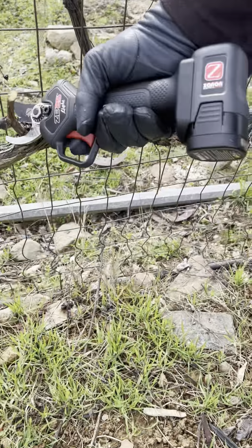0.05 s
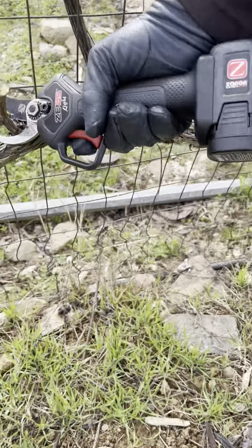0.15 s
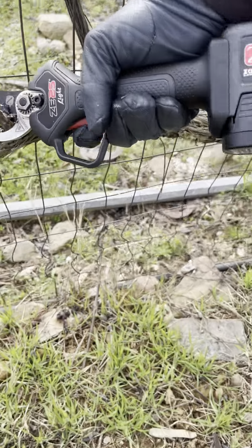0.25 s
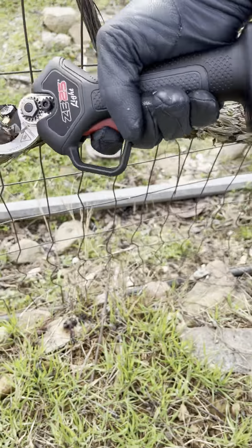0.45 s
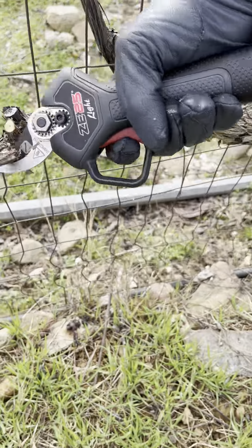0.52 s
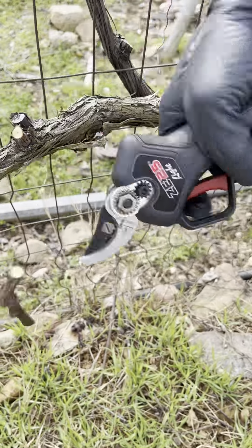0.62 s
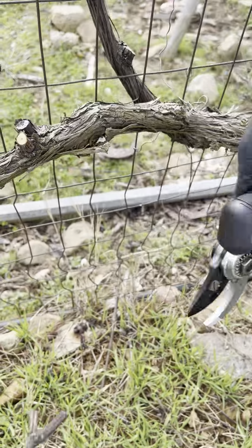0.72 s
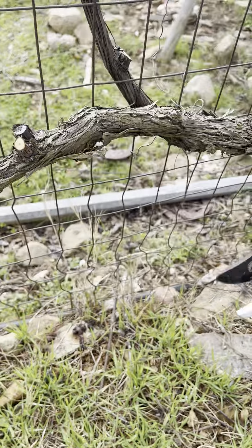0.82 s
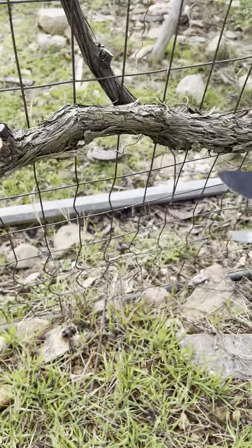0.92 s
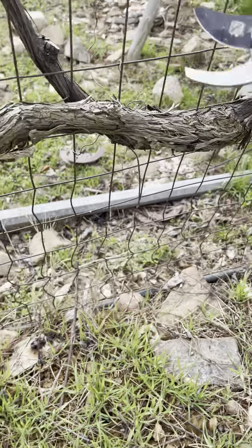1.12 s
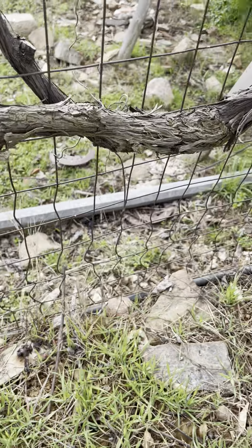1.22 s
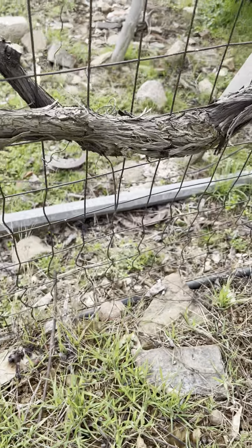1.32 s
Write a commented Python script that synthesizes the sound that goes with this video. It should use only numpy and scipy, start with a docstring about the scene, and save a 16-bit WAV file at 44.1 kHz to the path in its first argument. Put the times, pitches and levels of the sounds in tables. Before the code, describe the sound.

Two quick motor whines from electric pruning shears as the blade shuts and reopens.

```python
"""Outdoors, a battery pruning shear held close to a pair of microphones, over a faint rumble.
First a glove rustles and bumps on the grip. At 0.24 s the motor coils buzz, the rotor spins up, and
the gears whine and rattle in the casing; the blade knocks shut and the rotor brakes.
At 0.6 s a second stroke starts the same way, opens the blade and brakes in turn.
A faint low hum sinks and fades, leaving the glove and the rumble."""
import sys
import numpy as np
from scipy import signal
from scipy.fft import rfft, irfft
from scipy.io import wavfile

SR = 44100
rng = np.random.default_rng(int(sys.argv[2]) if len(sys.argv) > 2 else 0)


def put_to_file(sound):
    """Save the sound as 16-bit audio at rate SR, in the file named by the first command-line argument."""
    columns = np.atleast_2d(sound).T  # one column per channel
    safe = np.clip(columns, -1, 1)
    whole_steps = np.round(safe * 32767)
    wavfile.write(sys.argv[1], SR, whole_steps.astype(np.int16))


N = 59535
T = np.arange(N) / SR
HZ = np.fft.rfftfreq(2 * N, 1 / SR)


def from_db(db):
    """Decibels to gain."""
    return 10 ** (np.asarray(db) / 20)


def unit_rms(x):
    """Scale to unit power."""
    return x / np.sqrt(np.mean(x ** 2) + 1e-20)


def in_time(rows):
    """Each column of a curve at every sample."""
    times, *columns = np.transpose(rows)
    return [np.interp(T, times, column) for column in columns]


def during(start, end):
    """One from start to end, with 10 ms fades outside."""
    return np.clip(1 + 100 * np.minimum(T - start, end - T), 0, 1) ** 2


def at_hz(points, hz=HZ):
    """Read a spectrum on a log-frequency axis."""
    freqs, values = np.transpose(points)
    return np.interp(np.log(np.maximum(hz, 1)), np.log(freqs), values)


def filtered(x, gain):
    """Apply a frequency response."""
    return irfft(rfft(x, 2 * N) * gain)[:N]


def noise(gain):
    """Unit-power noise with the given spectrum."""
    return unit_rms(filtered(rng.standard_normal(N), gain))


def drift(hz):
    """Random wander up to the given rate, spread 1."""
    return noise(1 / (1 + (HZ / hz) ** 4))


def contacts(rows):
    """Each contact is a quickly dying noise burst around its own pitch."""
    out = np.zeros(N)
    for start, db, hz, octaves, t60 in rows:
        burst = noise(np.exp(-.5 * (np.log2((HZ + 1) / hz) / octaves) ** 2))
        age = np.maximum(T - start, 0)
        envelope = (1 - np.exp(-age * hz)) * np.exp(-np.log(1000) * age / t60)
        out += from_db(db) * envelope * burst
    return out


# Colour of the open air: (frequency [Hz], relative level [dB])
RUMBLE_COLOUR = [(20, -21), (35, -14), (55, 2.5), (95, 2), (160, -3), (270, -1), (400, -14.5), (700, -29.5),
                 (1100, -34.5), (3500, -31.5), (6500, -48.5), (11500, -54.5), (14000, -57.5)]
# Low hum in the background: (time [s], pitch [Hz], level [dB])
SINKING_HUM = [(.84, 296.7, -59.5), (.94, 257.2, -51.5), (1.06, 227.7, -51), (1.12, 197.7, -69)]


def outdoors(rumble_db=-56.5, side_db=-17, waver_db=3.5, waver_hz=17):
    """The bed of the place: faint rumble, nearly alike at both microphones, and a sinking hum."""
    mid, side = [noise(from_db(at_hz(RUMBLE_COLOUR))) for _ in range(2)]
    rumble = from_db(rumble_db) * (mid + from_db(side_db) * side * np.array([[1], [-1]]))
    hz, db = in_time(SINKING_HUM)
    hum_level = during(SINKING_HUM[0][0], SINKING_HUM[-1][0]) * from_db(db + waver_db * drift(hz=66.7))
    hum_cycles = np.cumsum(hz + waver_hz * drift(hz=40.9)) / SR
    return rumble + hum_level * np.sin(2 * np.pi * hum_cycles)


# Glove rubbing on the grip: (time [s], level [dB])
GLOVE_RUSTLE = [(0, -51), (.08, -70.5), (.15, -53), (.2, -58), (.56, -60.5), (.91, -56), (.97, -67),
                (1.02, -72.5), (1.35, -69.5)]
# Colour of that rustle: (frequency [Hz], relative level [dB])
GLOVE_COLOUR = [(400, 11.5), (1800, -5), (3200, -6.5), (4800, -4), (6500, -3.5), (8500, -2.5), (11000, 4),
                (13000, -26.5), (15000, -37.5)]
# Bumps on the grip: (time [s], level [dB], centre [Hz], width [octaves], t60 [s])
GLOVE_BUMPS = [(.064, -56.5, 746, 0.78, 0.1), (.092, -53, 1510, 0.42, 0.081), (.107, -38, 464, 0.4, 0.023),
               (.128, -33, 87, .9, 0.082)]


def glove():
    """Close to the microphones, a glove rustles and bumps on the grip."""
    db, = in_time(GLOVE_RUSTLE)
    return from_db(db) * noise(from_db(at_hz(GLOVE_COLOUR))) + contacts(GLOVE_BUMPS)


# The brake holding the rotor: (start [s], end [s], pitch [Hz], level [dB])
BRAKE_HOLDS = [(0.511, 0.544, 441.4, -44), (0.826, 0.889, 457, -49)]
# Harmonics of its buzz: (multiple of the pitch, relative level [dB])
BUZZ_HARMONICS = [(4, -1.5), (5, -2), (6, -2), (8, -14.5), (9, -17), (10, -8)]


def brake_buzz(waver_hz=3, flutter_db=3.5, wander_rate_hz=80):
    """The braking coils buzz on one pitch; the housing brings out the middle harmonics."""
    out = np.zeros(N)
    for start, end, hz, db in BRAKE_HOLDS:
        cycles = np.cumsum(hz + waver_hz * drift(wander_rate_hz)) / SR
        buzz = np.zeros(N)
        for multiple, harmonic_db in BUZZ_HARMONICS:
            level = from_db(harmonic_db + flutter_db * drift(wander_rate_hz))
            buzz += level * np.sin(2 * np.pi * (multiple * cycles + rng.random()))
        out += from_db(db) * during(start, end) * unit_rms(buzz)
    return out


# Modes of the housing: (frequency [Hz], gain [dB], t60 [s])
HOUSING_MODES = [(361, -21, 0.21), (795, -15.5, 0.049), (1984, -3.5, 0.061), (2423, -0.5, 0.046),
                 (3380, -3, 0.015), (4750, -2.5, 0.024), (5900, -12.5, 0.0415), (6050, -5, 0.01),
                 (7700, -8, .02)]


def housing_ring(jolts):
    """Each jolt sets the housing's modes ringing as dying sines."""
    out = np.zeros(N)
    for hz, db, t60 in HOUSING_MODES:
        decay, angle = np.exp(-np.log(1000) / (t60 * SR)), 2 * np.pi * hz / SR
        feedback = [1, -2 * decay * np.cos(angle), decay ** 2]
        out += from_db(db) * signal.lfilter([0, np.sin(angle)], feedback, jolts + 1e-18)
    return out


# Pulses before the rotor turns: (time [s], level [dB], pitch [Hz], jolt to the housing [dB])
START_PULSES = [(0.243, -15.5, 6520, -42.5), (0.2457, -11, 6530, -32.5), (0.5962, -16.5, 6600, -33),
                (0.5988, -18.5, 6230, -38)]


def coil_pulses(pulse_s=.0031):
    """Two shrill pulses of current start each stroke and jolt the housing."""
    pulses, jolts = np.zeros(N), np.zeros(N)
    for start, db, hz, jolt_db in START_PULSES:
        age = T - start
        envelope = np.sin(np.pi * np.clip(age / pulse_s, 0, 1)) ** 2
        pulses += from_db(db) * envelope * np.sin(2 * np.pi * hz * age)
        jolts[int(start * SR)] = from_db(jolt_db)
    return pulses + housing_ring(jolts)


# Knocks in the tool: (time [s], level [dB], centre [Hz], width [octaves], t60 [s])
TOOL_KNOCKS = [(.3993, -9.5, 6300, .2, .006), (.412, -32, 6400, 0.055, 0.0087),
               (.4205, -19, 7400, 0.12, 0.008), (.4208, -20, 2196, .9, 0.018),
               (.422, -33.5, 450, 1.7, 0.031), (.8045, -26.5, 1710, 0.096, .022),
               (.8348, -20, 6780, 1.3, 0.0054), (.954, -52, 5560, 1.3, 0.069)]


def knocks():
    """Blade, gears and trigger knock at close range around the end of each stroke."""
    return contacts(TOOL_KNOCKS)


# Resonances of the casing: (frequency [Hz], gain [dB])
CASING_COLOUR = [(120, -28.5), (300, -13.5), (550, -23), (780, -10.5), (1050, -20), (1400, -14), (1750, -7),
                 (2050, -9), (2450, -6), (3000, -17.5), (3500, -11), (4500, -10.5), (5400, -9), (6300, 1.5),
                 (7200, -5), (8000, 1), (9000, -30), (9800, -3.5), (10600, 0), (12000, -6.5), (13200, -17),
                 (14500, -35)]
TREBLE_SPLIT_HZ = 4500


def casing_gain(hz):
    """The casing colours the gears' sound on its way out to the microphones."""
    return from_db(at_hz(CASING_COLOUR, hz))


def gear_rattle(speed, low_db, bright_db, teeth_per_turn=7.5, decay_per_tooth=.6, scatter_db=1.5):
    """Teeth clatter in rapid, uneven bursts that follow the rotor, heard through the casing."""
    teeth = np.cumsum(speed) / SR * teeth_per_turn
    strength = from_db(scatter_db * rng.standard_normal(N))[teeth.astype(int)]
    bursts = unit_rms(strength * np.exp(-decay_per_tooth * (teeth % 1))) * rng.standard_normal(N)
    lowpass = 1 / (1 + (HZ / TREBLE_SPLIT_HZ) ** 8)
    low = filtered(bursts, unit_rms(casing_gain(HZ) * lowpass))
    bright = filtered(bursts, unit_rms(casing_gain(HZ) * (1 - lowpass)))
    return from_db(low_db) * low + from_db(bright_db) * bright


# Pitch of each gear tone: (multiple of the rotor speed)
GEAR_ORDERS = [1, 3.25, 4, 5, 7.5, 10.5, 12, 20, 21.66, 22.66, 27, 32.1, 35, 37.5, 42.6]
# Their relative levels: (closing free [dB], closing strained [dB], opening free [dB],
# opening strained [dB])
GEAR_LEVELS = [(-58, -50, -37, -38), (-50, -48, -43, -48), (-44, -41, -39.5, -49), (-58, -41, -29.5, -35),
               (-35.5, -37, -42.5, -36), (-21, -26.5, -45, -23.5), (-40, -41, -44, -29),
               (-33, -32, -44, -46), (-27, -33, -19, -33), (-32, -39, -35, -38), (-45, -34, -50, -42),
               (-40, -25, -44, -31), (-39, -30, -54, -37), (-55, -34, -54, -43), (-40, -27, -53, -28)]
# Shrill tones as the tool is drawn away from the microphones: (time [s], gain [dB])
DRAW_AWAY = [(.72, 0), (.75, -5.5)]


def gear_whine(speed, strain, opening):
    """Gear tones sweep through the casing's resonances; strain shifts their balance and adds judder."""
    judder_turns = (.001 + .0018 * strain) * drift(hz=169)
    turns = np.cumsum(speed) / SR + judder_turns
    fade_db, = in_time(DRAW_AWAY)
    out = np.zeros(N)
    for multiple, levels in zip(GEAR_ORDERS, GEAR_LEVELS):
        free_db, strained_db = levels[2:] if opening else levels[:2]
        level = (1 - strain) * from_db(free_db) + strain * from_db(strained_db)
        flutter_db = (1.7 + 3 * strain) * drift(hz=130)
        is_shrill = multiple * np.max(speed) > TREBLE_SPLIT_HZ
        tone = np.sin(2 * np.pi * (multiple * turns + rng.random()))
        out += level * casing_gain(multiple * speed) * from_db(flutter_db + is_shrill * fade_db) * tone
    return out


# The rotor in each stroke: (time [s], speed [turns/s])
CLOSING_SPEED = [(.255, 30), (.274, 150), (.286, 240), (.298, 284), (.318, 316), (.345, 325), (.36, 322),
                 (.378, 308), (.42, 300), (.44, 254), (.453, 182), (.469, 125), (.5, 65), (.55, 20)]
OPENING_SPEED = [(.608, 30), (.624, 155), (.648, 276), (.662, 304), (.682, 322), (.715, 334), (.762, 334.5),
                 (.772, 322), (.785, 272), (.803, 178), (.83, 80), (.89, 30)]
# Effort in each stroke: (time [s], whine gain [dB], strain [0-1], low rattle [dB], bright rattle [dB])
CLOSING_EFFORT = [(.252, -49, 0.3, -37, -61.5), (.266, -13, 1, -52.5, -36), (0.281, .5, 0.49, -44, -41),
                  (.3, -3.5, 0, -39, -33.5), (0.344, 6, 0, -39, -36.5), (.362, 6.5, 0.33, -44, -26),
                  (0.377, 5, 0.66, -39.5, -28), (0.417, 2, 1, -35, -33.5), (0.427, -6.5, 0.1, -41, -32),
                  (0.441, -3, 0.5, -40, -35), (0.452, -9.5, 0.8, -41, -37.5), (0.493, -8, 1, -47.5, -41.5),
                  (.53, -28.5, 0.6, -49, -50), (.56, -30, 0.2, -65.5, -58)]
OPENING_EFFORT = [(0.6, -38, 0.79, -33.5, -39.5), (0.61, -19, 0.94, -46.5, -52),
                  (0.627, -6.5, 1, -38, -32.5), (0.639, 0.5, 0.46, -38, -31),
                  (0.651, -2.5, 0.66, -41.5, -37), (0.654, 0.5, 0, -38, -34.5), (0.72, 6, 0, -45, -34),
                  (0.765, 4, 0, -44, -34.5), (0.782, -.5, 0.51, -40, -33), (0.805, -4, 1, -45.5, -35),
                  (0.815, -16.5, 0.54, -45.5, -36.5), (0.845, -26, 1, -49.5, -49.5),
                  (0.885, -61, 0.36, -53, -48), (0.902, -67.5, 0.63, -63, -65)]


def motor_stroke(opening):
    """In the foreground, the rotor spins up and slows, driving the gears' whine and rattle."""
    speed, = in_time(OPENING_SPEED if opening else CLOSING_SPEED)
    effort = OPENING_EFFORT if opening else CLOSING_EFFORT
    whine_db, strain, low_db, bright_db = in_time(effort)
    whine = from_db(whine_db) * gear_whine(speed, strain, opening)
    rattle = gear_rattle(speed, low_db, bright_db)
    return during(effort[0][0], effort[-1][0]) * (whine + rattle)


# Phase between the microphones: (frequency [Hz], lead of the left [rad])
MIC_PHASE = [(400, 0), (800, .6), (1300, 0), (2600, .7), (3600, .8), (4300, 1.3), (5300, 5.1), (5900, 6.28),
             (8000, 8.4), (11000, 11.1), (12100, 12.5)]
# Balance between them: (frequency [Hz], left minus right [dB])
MIC_BALANCE = [(450, -4.5), (900, 2), (1500, -2), (2800, 1), (3300, -6), (5000, 2.5), (5700, 0)]
# Sound scattered by hand and ground: (frequency [Hz], gain [dB])
NEAR_SCATTER = [(1500, -15.5), (3500, -4.5), (6200, -19.5)]


def microphones(source, scatter_t60_s=.053):
    """The close tool reaches the pair out of step, with a little scatter from hand and ground."""
    pan = from_db(at_hz(MIC_BALANCE) / 2)
    right_lag = np.exp(-1j * at_hz(MIC_PHASE))
    channels = []
    for direct in (pan, right_lag / pan):
        tail = rng.standard_normal(N) * np.exp(-np.log(1000) * T / scatter_t60_s)
        scatter = from_db(at_hz(NEAR_SCATTER)) * rfft(tail / np.linalg.norm(tail), 2 * N)
        channels.append(filtered(source, direct + scatter))
    return np.array(channels)


def scene():
    """The blade closes, then opens, close to the microphones with the open air behind."""
    motor = motor_stroke(opening=False) + motor_stroke(opening=True)
    close_sounds = motor + coil_pulses() + brake_buzz() + knocks() + glove()
    return microphones(close_sounds) + outdoors()


def record(dry):
    """The highest treble is cut off steeply on both channels."""
    stop_hz = 15700
    return signal.sosfilt(signal.cheby2(12, 70, stop_hz, fs=SR, output="sos"), dry)


dry = scene()
out = record(dry)
put_to_file(out)
```